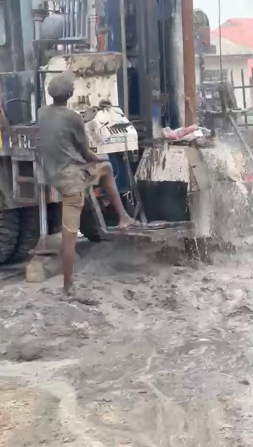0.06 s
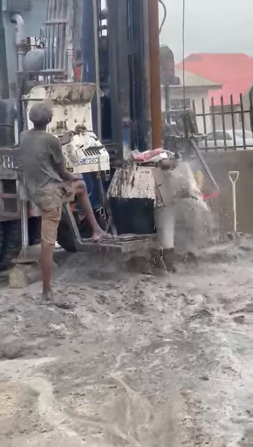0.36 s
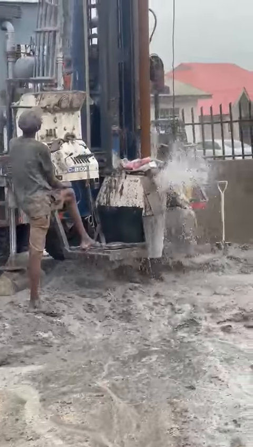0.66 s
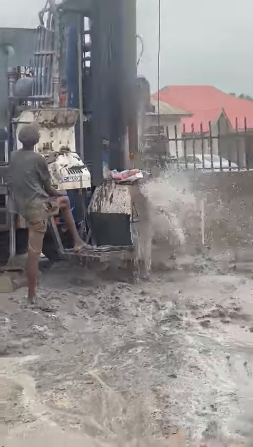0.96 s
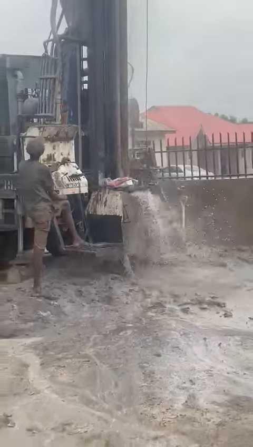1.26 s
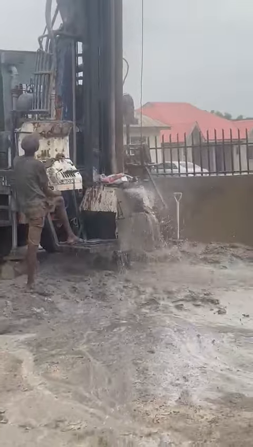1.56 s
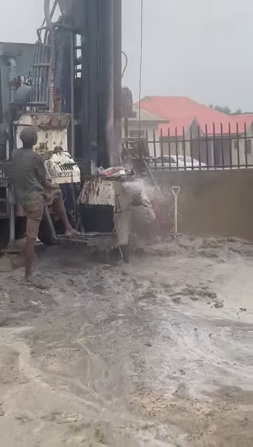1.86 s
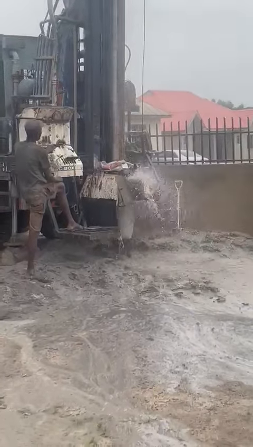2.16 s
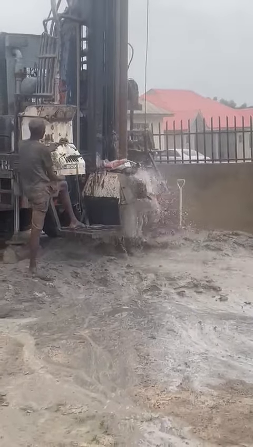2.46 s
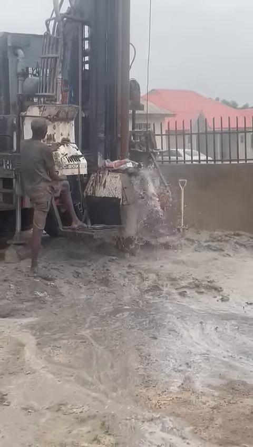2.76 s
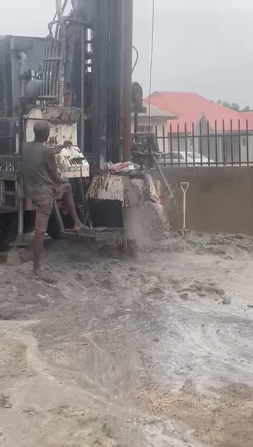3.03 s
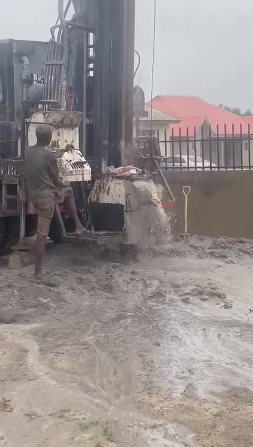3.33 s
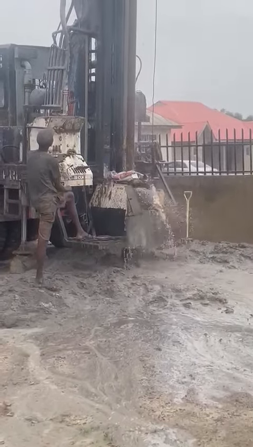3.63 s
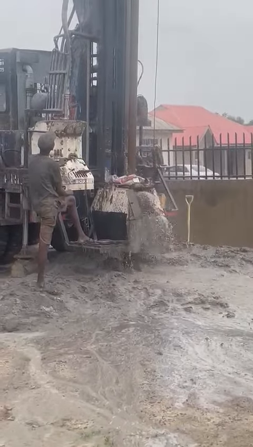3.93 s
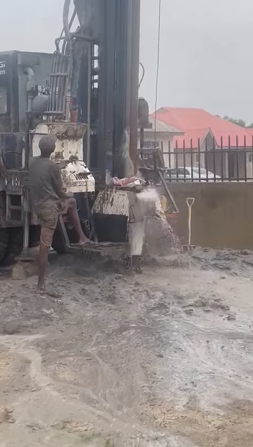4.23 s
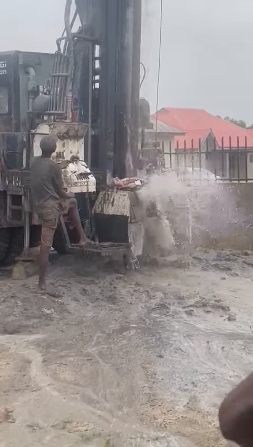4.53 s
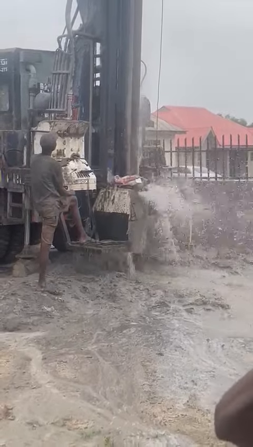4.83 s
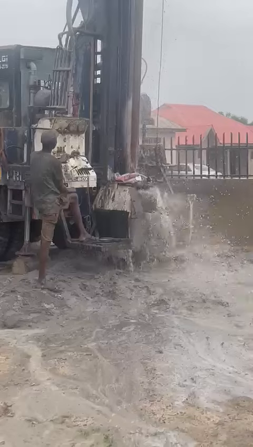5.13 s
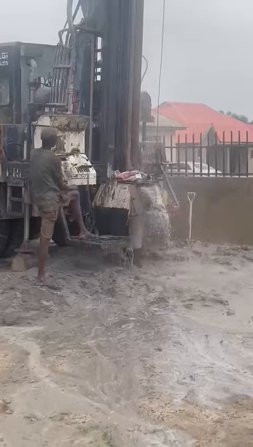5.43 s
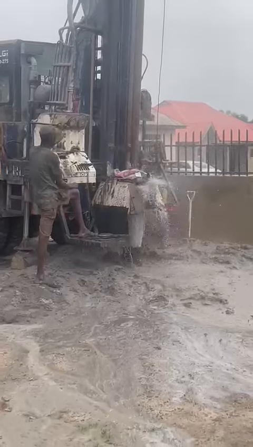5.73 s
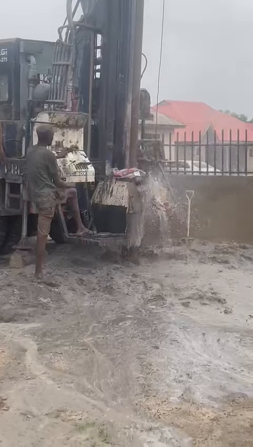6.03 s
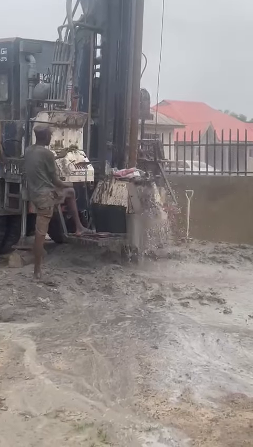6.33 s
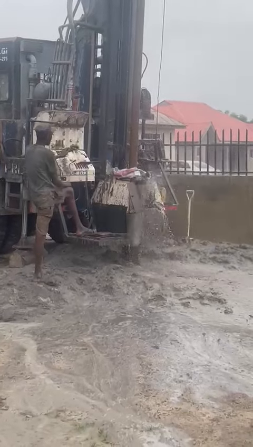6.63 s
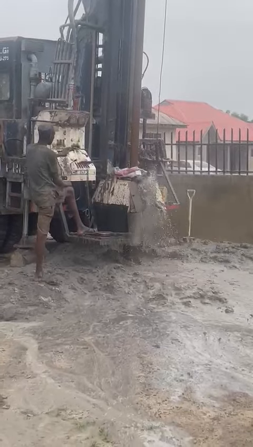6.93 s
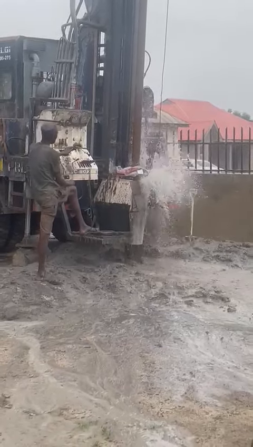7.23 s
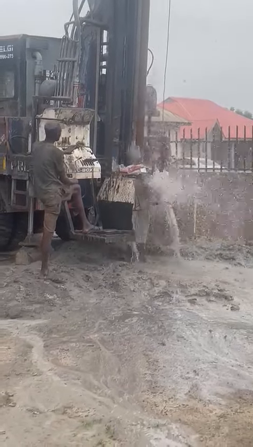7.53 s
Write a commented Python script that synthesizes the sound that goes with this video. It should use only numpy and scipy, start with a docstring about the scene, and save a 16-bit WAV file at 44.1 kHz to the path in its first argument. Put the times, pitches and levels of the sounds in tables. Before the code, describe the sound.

A borehole drilling rig runs outdoors, its diesel engine and air compressor making a steady, deep drone and roar. Over it the turning steel pipe rings and squeals unevenly, with a fast hammering chatter. Air blows muddy water from the hole in repeated gushing, hissing surges, with a few sharp spits. A hand bumps the microphone softly a few times.

```python
"""A truck-mounted drilling rig, heard from the open yard where it sinks a borehole. Its six-cylinder
diesel drones in the middle, beating against the hum of an air compressor. The hammer and the turning
pipe keep the steel ringing and squealing, while compressed air throws muddy water out of the hole in
surges. Right at the microphone a hand bumps softly, and for three seconds a fingertip shades one of
the two ports, turning the roar wide and hollow."""
import sys
import numpy as np
from scipy import signal
from scipy.fft import rfft, irfft, next_fast_len
from scipy.io import wavfile
from scipy.ndimage import uniform_filter1d

SR = 44100
rng = np.random.default_rng(int(sys.argv[2]) if len(sys.argv) > 2 else 0)


def bounce(signal):
    """Save signal as a 16-bit WAV file at the path given by the first command-line argument."""
    frames = np.transpose(np.atleast_2d(signal))
    limited = np.clip(frames, -1, 1)
    pcm = np.round(limited * 32767).astype(np.int16)
    wavfile.write(sys.argv[1], SR, pcm)


N = 339129
T = np.arange(N) / SR


def amp(db):
    """Decibels to gain."""
    return 10 ** (np.asarray(db) / 20)


def unit(x):
    """Scales to an rms of one."""
    return x / np.sqrt(np.mean(x ** 2) + 1e-20)


def over_time(rows):
    """One curve for each column of a table of times."""
    times, *columns = np.transpose(rows)
    return [np.interp(T, times, column) for column in columns]


def over_hz(rows, hz):
    """One curve for each column of a table of frequencies."""
    row_hz, *columns = np.transpose(rows)
    return [np.interp(np.log(hz + 1), np.log(row_hz + 1), column) for column in columns]


def colour(x, spectrum, tilt_db=0):
    """Gives x a spectrum, tilted by so many dB an octave, at unit level."""
    size = next_fast_len(x.shape[-1])
    hz = np.fft.rfftfreq(size, 1 / SR)
    gain = amp(over_hz(spectrum, hz)[0] + tilt_db * np.log2(np.clip(hz, 400, 7500)))
    return unit(irfft(rfft(x, size) * gain, size)[..., :x.shape[-1]])


def drift(rate):
    """A random curve of unit size that heads for a new value `rate` times a second."""
    knots = rng.standard_normal(4096)
    return unit(np.interp(T * rate, np.arange(len(knots)), knots))


def noise():
    """Two unrelated white noises."""
    return rng.standard_normal((2, N))


def patchy(x, depth_db, size):
    """Turbulence: patches of size (bins, frames) swell and fade."""
    spectrum = signal.stft(x, nperseg=256)[2]
    patches = uniform_filter1d(rng.standard_normal(spectrum.shape[1:]), size[0], axis=0)
    patches = unit(uniform_filter1d(patches, size[1], axis=1))
    return signal.istft(spectrum * amp(depth_db * patches))[1][:, :N]


def cycle_tones(turns, harmonics, waver, lag_turns=.14):
    """Harmonics of a six-pulse cycle: every sixth stays in step, and the weaker ones waver more."""
    top_db = max(db for _, db in harmonics)
    out = 0
    for k, db in harmonics:
        # each overtone of the pulse lags a little, so the pressure climbs slowly and drops fast
        phase = rng.random() if k % 6 else -lag_turns * (k // 6 - 1)
        level = amp(db + waver * (top_db - db) * drift(rate=7))
        out = out + np.sqrt(2) * level * np.cos(2 * np.pi * (k * turns + phase))
    return out


# The diesel on the truck; uneven cylinders leave lines between the firing tones.
# Each row: multiple of the six-firing cycle, level in dB.
DIESEL_TONES = [(5, -46), (6, -12), (7, -45.5), (8, -44), (9, -40), (10, -46), (11, -38.5), (12, -23.5),
                (13, -44), (14, -41.5), (15, -38.5), (17, -50), (18, -41.5), (20, -48.5), (22, -48),
                (23, -51.5), (24, -44), (26, -48.5), (30, -49), (32, -55.5), (33, -53)]
# The compressor's hum. Each row: multiple of its cycle, level in dB.
COMPRESSOR_TONES = [(5, -38), (6, -32.5), (12, -54), (18, -50)]
def engines(firings, compressor_cycle_hz=22.3):
    """The diesel's exhaust drones deeply; the compressor beats against its second firing harmonic."""
    diesel = cycle_tones(firings / 6, DIESEL_TONES, waver=0.051)
    compressor = cycle_tones(compressor_cycle_hz * T + .033, COMPRESSOR_TONES, waver=0.031)
    return diesel + compressor


# Exhaust, fans and gears, heard together across the yard. Each row: frequency in Hz, relative dB.
ROAR_SPECTRUM = [(15, -18), (40, -5.5), (65, 1), (150, 0), (220, -6), (300, -6.5), (430, -6.5), (560, -5.5),
                 (700, -7), (860, -9), (1150, -2.5), (1500, -21.5), (3000, -14.5), (8000, -59)]
def roar(firings, level_db=-28.0, throb=0.059):
    """Exhaust and fan turbulence swells with every firing."""
    puffs = noise() * (1 + throb * np.cos(2 * np.pi * firings))
    return amp(level_db) * colour(patchy(puffs, depth_db=2.5, size=(3, 14)), ROAR_SPECTRUM)


def hammer(blows_hz=25.84, decay_turns=0.4, depth=0.7):
    """The air hammer's force jumps at each uneven blow, then falls."""
    turns = np.cumsum(blows_hz * (1 + .02 * drift(rate=5))) / SR
    strength = depth * amp(5.2 * drift(rate=21))
    return unit(1 + strength * np.exp(-(turns % 1) / decay_turns))


# The steady gush at the mouth of the hole. Each row: time in seconds, relative level in dB.
STEADY_GUSH = [(0, -37), (0.2, -32.5), (0.5, -32.5), (1.2, -29), (1.42, -33.5), (1.7, -29.5), (3.95, -30),
               (4.3, -25.5), (5.05, -27), (5.19, -29.5), (5.3, -32), (7.69, -29)]
# Surges of air and water out of the hole.
# Each row: peak time and length in seconds, then gush, spray and jet in relative dB.
WATER_SURGES = [(0.548, 0.43, -29.5, -54, -29), (1.067, 0.17, -29, -33, -42), (1.25, 0.16, -28.5, -48, -45),
                (1.757, 0.22, -23.5, -32, -45), (2.004, 0.19, -29, -36, -48), (2.363, 0.17, -31, -31, -44),
                (2.527, .14, -31, -53, -44), (2.772, 0.27, -29.5, -56, -47),
                (3.17, 0.48, -25.5, -35.5, -47), (3.477, 0.27, -28.5, -38, -46),
                (4.093, 0.18, -25, -42, -44), (4.33, 0.32, -29, -39, -44), (4.48, 0.23, -24, -34.5, -35.5),
                (4.617, 0.18, -39, -52, -46), (4.803, 0.33, -25.5, -34.5, -45),
                (4.99, 0.16, -23.5, -39, -32), (5.09, 0.16, -28, -35, -44), (5.36, 0.48, -30, -35.5, -44),
                (5.574, 0.37, -26, -39, -36), (5.985, 0.15, -28, -33.5, -32), (6.125, 0.2, -26.5, -44, -43),
                (6.366, 0.26, -25, -35, -24.5), (6.574, 0.4, -25, -57, -46), (6.878, 0.19, -27.5, -50, -33),
                (7.053, 0.27, -30.5, -36.5, -45), (7.447, 0.28, -34, -33, -34),
                (7.633, 0.22, -23, -41, -31)]
def flow_levels(steady_spray_db=-37.5, steady_jet_db=-41):
    """Gush, spray and jet in relative dB: each surge swells and sinks on top of the steady flow."""
    steady_gush_db, = over_time(STEADY_GUSH)
    power = amp(np.broadcast_arrays(steady_gush_db, steady_spray_db, steady_jet_db)) ** 2
    for peak, length, *levels_db in WATER_SURGES:
        during = abs(T - peak) < length / 2
        swell = np.cos(np.pi * (T[during] - peak) / length)
        power[:, during] += np.outer(amp(levels_db), swell) ** 2
    return 10 * np.log10(power)


def drops(per_s, spread_db):
    """Drops of uneven size click at random moments."""
    sizes = amp(spread_db * np.minimum(rng.exponential(1, (2, N)), 4))
    return unit(sizes * np.sign(noise()) * (rng.random((2, N)) < per_s / SR))


# At the hole: muddy gush, air jet at the collar, spray and mist. Each row: frequency in Hz, relative dB.
GUSH_SPECTRUM = [(300, -20), (900, 0), (1150, -4), (1400, 2), (2000, 0.5), (2500, -3), (2800, -11.5),
                 (3100, -15.5), (3600, -10.5), (4200, -19.5), (6000, -15.5), (11000, -73)]
JET_SPECTRUM = [(1400, -14), (2200, 6.5), (2550, 2), (2800, -4), (3100, -4), (3650, -7), (4400, -23),
                (8000, -49)]
SPRAY_SPECTRUM = [(1000, -31), (2500, -11), (3600, 8.5), (4400, 3), (4900, 5), (6000, 4.5), (6800, 1.5),
                  (7400, -2.5), (8200, 14), (9200, -78), (11500, -3)]
MIST_SPECTRUM = [(3000, -5), (7000, 1), (8300, -15), (9300, -51), (10000, 14.5), (10700, 9), (11300, 4.5),
                 (11800, -14)]
# Fine mist hanging over the hole. Each row: time in seconds, relative level in dB.
MIST_SWELL = [(0, -38), (1.15, -33.5), (2.6, -36), (4.6, -36.5), (4.8, -33.5), (5.15, -32.5), (5.7, -36.5),
              (6.0, -35.5), (6.7, -39), (7.4, -34.5), (7.69, -35)]
def water(force):
    """Air gushes out in time with the hammer, hisses past the collar and tears water to spray and mist."""
    gush_db, spray_db, jet_db = flow_levels()
    mist_db, = over_time(MIST_SWELL)
    splutter_db = 1.27 * drift(rate=55) + 1.34 * drift(rate=16)  # quick splutter, slower slosh
    gush = patchy(noise() * force + .5 * drops(per_s=700, spread_db=1.0), depth_db=2.1, size=(4, 8))
    jet = patchy(noise() * force, depth_db=1.5, size=(3, 8))
    spray = patchy(noise() + 0.5 * drops(per_s=1400, spread_db=-0.5), depth_db=3.5, size=(5, 12))
    mist = patchy(noise() + 0.6 * drops(per_s=2500, spread_db=1.0), depth_db=2.5, size=(6, 10))
    return (colour(gush, GUSH_SPECTRUM) * amp(gush_db - 5 + .5 * splutter_db)
            + colour(jet, JET_SPECTRUM) * amp(jet_db - 5)
            + colour(spray, SPRAY_SPECTRUM) * amp(spray_db - 2 + splutter_db)
            + colour(mist, MIST_SPECTRUM) * amp(mist_db - 2 + .5 * splutter_db))


def ring(drive, hz, width):
    """One mode of the steel, with steep skirts, at unit level."""
    b, a = signal.iirpeak(hz, hz / (1.5 * width), fs=SR)
    return unit(signal.lfilter(b, a, signal.lfilter(b, a, drive)))


def held(x, firmness=0.63):
    """Steady contact evens out the slow swells of a ringing mode."""
    power = abs(uniform_filter1d((x ** 2).mean(0), size=5000)) + 1e-9
    return unit(x / power ** (firmness / 2))


def shaking(force):
    """The smoothed, bounded motion that the hammer gives to the steel."""
    motion = unit(uniform_filter1d(force - force.mean(), size=400))
    return unit(np.tanh(motion))


# Modes of the guide around the pipe. Each row: frequency and width in Hz, level in dB.
GUIDE_MODES = [(653, 30, -42), (734.5, 30, -39.5)]
def guide():
    """The guide hums with the rubbing pipe and rings when it is knocked."""
    drive = noise()
    drive[0] += knocks()  # into the part that left and right share
    return sum(amp(db) * ring(drive, hz, width) for hz, width, db in GUIDE_MODES)


# Modes of the drill pipe. Each row: frequency and width in Hz, relative level in dB.
PIPE_MODES = [(1014, 34, -9.5), (1087, 28, -3.5), (1102, 13, -6.5), (1122.3, 6.6, 1.5), (1144, 5.3, -7),
              (1174, 15, -9), (1227, 9, -9), (1221, 19, -6)]
# How hard the pipe grinds. Each row: time in seconds, relative load in dB.
PIPE_LOAD = [(0.0, -39), (0.3, -37.5), (0.5, -35), (0.85, -31), (0.95, -38), (1.24, -36), (1.45, -37),
             (1.63, -47), (1.76, -28), (2.0, -30.5), (2.12, -38), (2.24, -29.5), (2.36, -45), (2.5, -30),
             (2.7, -39.5), (2.85, -30), (3.19, -30.5), (3.6, -31), (3.77, -35), (3.9, -27), (4.0, -31.5),
             (4.07, -27.5), (4.55, -25.5), (4.68, -28), (4.8, -28), (5.08, -26.5), (5.16, -36), (5.45, -35),
             (5.63, -24.5), (5.87, -39), (6.0, -29), (6.25, -39.5), (6.43, -28.5), (6.7, -32.5), (7.0, -34),
             (7.2, -39), (7.35, -32), (7.69, -32.5)]
# The ring bends as the contact shifts.
# Each row: time in seconds, pitch in Hz, whose ratio to the average bends all the modes.
PIPE_BEND = [(0, 1124), (2.7, 1123), (3.1, 1108), (3.7, 1124), (4.3, 1120), (4.6, 1106), (4.85, 1134),
             (5.0, 1116), (5.6, 1126), (6.05, 1128), (6.5, 1112), (7.1, 1124)]
def pipe(force, level_db=-32, follow=0.94, chatter=0.16, wander=0.00249, restless_db=1.8):
    """Grinding rings the pipe; its modes take turns and bend, and the hammer chops them into a chatter."""
    load_db, = over_time(PIPE_LOAD)
    pitch, = over_time(PIPE_BEND)
    modes = held(sum(amp(db + restless_db * drift(rate=7)) * ring(noise(), hz, width)
                     for hz, width, db in PIPE_MODES))
    bent_time = T + np.cumsum(pitch / pitch.mean() - 1 + wander * drift(rate=12)) / SR
    bent = np.array([np.interp(bent_time, T, channel, period=N / SR) for channel in modes])
    level = amp(level_db + follow * (load_db - load_db.mean()))
    return level * bent * unit(1 + chatter * shaking(force))


# Modes of the mast above the hole. Each row: frequency and width in Hz, level in dB at average gush.
MAST_MODES = [(1328, 14, -44), (1448, 13, -41.5), (1537, 20, -43.5), (1649, 31, -42), (1848, 6.6, -44.5),
              (1926, 22, -42.5), (1949, 11, -42), (2393, 18, -45), (2540, 29, -46.5), (2588, 36, -48.5),
              (2944, 11, -46.5), (2976, 8.5, -46), (3053, 35, -47), (3140, 15.5, -46), (3244, 22, -48),
              (3487, 33, -47.5), (4290, 25, -54.5), (6220, 90, -54), (6970, 96, -59.5)]
def mast(force, follow=0.52, restless_db=1.5):
    """The hammer rings the mast, and more so while mud blasts against it."""
    gush_db = flow_levels()[0]
    drive = noise() * force
    modes = sum(amp(db + restless_db * drift(rate=9)) * held(ring(drive, hz, width))
                for hz, width, db in MAST_MODES)
    return amp(follow * (gush_db - gush_db.mean())) * modes


# Squeals of the rubbing pipe.
# Each row: start and length in seconds, pitch in Hz, level in dB at the height, chatter from 0 to 1.
PIPE_SQUEALS = [(-.08, .35, 1125, -30.5, .5), (-.1, .8, 1191, -38, .4), (-.1, .8, 3480, -43, 1),
                (.12, .2, 2945, -38, .6), (.35, 1.35, 1848, -40, .4), (.44, .22, 2960, -37.5, .7),
                (.5, .22, 2600, -39, .8), (.98, .62, 1192, -27.5, .55), (1.07, .42, 1143, -31.5, .6),
                (1.07, .42, 1117, -33, .6), (1.43, .44, 1848, -27.5, .35), (1.8, .3, 1846, -33.5, .45),
                (1.92, .1, 1970, -34, .4), (1.95, 1.7, 2974, -36.5, .25), (2.03, .27, 1325, -38, .3),
                (2.5, .35, 3105, -40, .8), (2.8, .36, 2962, -37, .9), (2.83, .27, 2940, -35.5, 1),
                (3.0, .62, 1455, -38, .6), (3.33, .15, 2966, -38, .3), (3.98, .5, 1120, -31, .8),
                (4.27, .17, 1655, -35, .8), (4.38, .25, 2972, -39, .6), (4.41, .24, 1448, -33, .8),
                (4.45, .22, 1103, -28.5, .8), (4.5, .22, 1965, -36, .8), (4.66, .38, 1062, -33, 1),
                (4.9, .2, 2972, -39, .6), (4.94, .1, 1848, -35, .7), (5.22, .25, 1848, -38, .3),
                (5.72, 1.35, 2980, -36.5, .3), (6.0, .85, 3118, -38.5, .6), (6.2, .28, 2505, -36, .8),
                (6.3, .14, 2595, -36, .6), (6.34, .42, 1108, -32.5, .9), (6.56, .18, 2595, -36, .6),
                (6.78, .42, 2980, -40, .5), (7.3, .16, 2975, -39.5, .5), (7.5, .3, 2950, -38, .6)]
def squeals(force, wobble_hz=6, flutter_db=1.2, shake_depth=.7):
    """Stick and slip make one mode sing, swell and fade; the hammer shakes it into a chatter."""
    out, shake = 0, shaking(force)
    for start, length, hz, db, chatter in PIPE_SQUEALS:
        grip = unit(amp(flutter_db * drift(rate=42)) * (1 + shake_depth * chatter * shake))
        swell = np.sin(np.pi * np.clip((T - start) / length, 0, 1)) * grip
        phase = 2 * np.pi * np.cumsum(hz + wobble_hz * (1 + chatter) * drift(rate=80)) / SR
        out = out + np.sqrt(2) * amp(db) * swell * np.array([np.cos(phase), np.sin(phase)])
    return out


# Slugs of water spat from the hole by the air, and near 1.7 s a few sharp cracks of stone chips striking the
# deflector. # Each row: start in seconds, level in dB, rise and decay in seconds, brightness in dB per octave.
SLUGS_AND_CHIPS = [(0.161, -27.5, .006, 0.021, 1), (.815, -21.5, 0.02, 0.012, -2),
                   (0.9, -27, 0.0092, 0.015, -2), (1.694, -17, .002, 0.0033, 15),
                   (1.696, -18, .004, 0.029, 11.5), (1.701, -13, 0.00072, .004, 13),
                   (1.736, -19.5, 0.0037, 0.013, -8), (1.767, -26, .003, 0.02, -7),
                   (1.8, -26, 0.0089, 0.025, -7), (2.616, -26.5, 0.0059, 0.015, 4),
                   (2.87, -27, 0.0088, .02, -8), (3.03, -25.5, 0.011, 0.026, 10),
                   (3.551, -18, 0.0011, .003, -5), (3.561, -24, 0.0073, 0.018, -7),
                   (3.925, -27.5, 0.022, 0.053, 10.5), (4.129, -32, 0.015, 0.017, 13),
                   (4.74, -26, 0.021, 0.025, 11), (5.955, -28, 0.016, 0.036, 9),
                   (6.428, -25.5, 0.0078, 0.029, 5.5), (6.78, -27, .013, 0.021, 12),
                   (7.141, -29, 0.028, .025, 11), (7.4, -25.5, 0.0096, 0.018, 8)]
# The hiss of a slug. Each row: frequency in Hz, relative dB.
SLUG_SPECTRUM = [(300, -28), (1100, 12.5), (3000, 11.5), (4500, -4.5), (7000, -5), (9000, -37), (12000, -9)]
def spits():
    """Each slug of water bursts out with a quickly dying hiss and mostly swells softly; stone chips crack
    sharply against the deflector."""
    out, t = np.zeros((2, N)), T[:SR // 2]
    for start, db, rise, decay, bright_db in SLUGS_AND_CHIPS:
        hiss = colour(rng.standard_normal((2, len(t))), SLUG_SPECTRUM, bright_db)
        burst = hiss * np.minimum(t / rise, 1) * np.exp(-np.maximum(t - rise, 0) / decay)
        part = out[:, round(start * SR):][:, :len(t)]
        part += amp(db) * burst[:, :part.shape[1]]
    return out


# Dull knocks of the pipe on its guide. Each row: time in seconds, impulse in dB over the rubbing.
GUIDE_KNOCKS = [(.422, 53), (1.344, 47), (2.186, 48), (5.195, 53.5), (6.137, 51), (6.269, 52), (7.379, 48)]
def knocks(contact_s=0.0022):
    """The pipe gives soft, short pushes that reach only the low modes."""
    pushes = sum(amp(db) * np.exp(-np.minimum(abs(4 * (T - time) / contact_s), 10) ** 2)
                 for time, db in GUIDE_KNOCKS)
    pulse_area = np.sqrt(np.pi) * contact_s * SR / 4
    return pushes / pulse_area


# A hand on the microphone's housing. Each row: start in seconds, level in dB, length in seconds.
HAND_BUMPS = [(0.633, -30, 0.13), (2.57, -33, 0.097), (2.683, -36, 0.084), (5.653, -41, 0.061),
              (7.158, -39, 0.051)]
# Its dull thud. Each row: frequency in Hz, relative dB.
BUMP_SPECTRUM = [(30, -17), (90, -4), (200, 15), (450, -22), (1200, -10), (5000, -70)]
def bumps():
    """The hand thuds softly at each port on its own."""
    swell = sum(amp(db) * np.sin(np.pi * np.clip((T - start) / length, 0, 1))
                for start, db, length in HAND_BUMPS)
    return swell * colour(noise(), BUMP_SPECTRUM)


# The rig at the two microphone ports. Each row: frequency in Hz, lead of the left port in radians.
PORT_LEAD = [(0, 0.8), (200, -.1), (600, -.45), (900, -1), (1200, -.9), (1600, 0.12), (4100, 0),
             (4900, 3.02), (5400, 5.82), (6800, 6.5), (8200, 9.1), (9600, 8.71), (11500, 12.27)]
# How alike left and right sound: wide near 1 kHz, narrow in the treble.
# Each row: frequency in Hz, likeness from 0 to 1.
STEREO_LIKENESS = [(100, 1), (300, 1), (720, 0.91), (1000, 0.35), (1150, 0.91), (1400, 0.92), (1650, 1),
                   (2300, 1), (3100, 0.82), (3800, 1), (4500, 1), (5800, 1), (7400, 1), (9000, 0.98)]
# A fingertip over one port. Each row: time in seconds, cover from 0 to 1.
FINGER_COVER = [(2.5, 0), (2.6, .72), (3.4, .9), (4.6, 1), (5.68, .88), (5.74, 0)]
# Its effect at full cover. Each row: frequency in Hz, added lead in radians, factor on likeness.
FINGER_SHADE = [(100, -.4, .95), (250, -.3, .92), (480, -.75, .6), (690, -.8, .95), (800, -1.8, 1.2),
                (870, -2.25, 1.55), (930, -1.9, 1.5), (1010, -.9, 1.1), (1130, -.9, .9), (1280, -1, .35),
                (1600, 0, 1)]
def stereo_image(pair):
    """Left and right are partly the same sound at different phases; the fingertip shifts the low mids."""
    hz, t, (shared, differing) = signal.stft(pair, SR, nperseg=1024)
    cover = np.interp(t, *np.transpose(FINGER_COVER))
    shade_lead, shade_likeness = over_hz(FINGER_SHADE, hz)
    lead = over_hz(PORT_LEAD, hz)[0][:, None] + np.outer(shade_lead, cover)
    open_likeness = over_hz(STEREO_LIKENESS, hz)[0][:, None]
    likeness = np.clip(open_likeness * (1 + np.outer(shade_likeness - 1, cover)), 0, 1)
    common = shared * np.sqrt((1 + likeness) / 2)
    apart = differing * np.sqrt((1 - likeness) / 2)
    turn = np.exp(.5j * lead)
    left, right = (common + apart) * turn, (common - apart) / turn
    return signal.istft(np.array([left, right]))[1][:, :N]


# The diesel's pace, which drives both drone and roar. Each row: time in seconds, firings a second.
FIRING_RATE = [(0, 64.97), (1.3, 64.86), (2.5, 64.94), (5, 64.94), (7.7, 65.24)]
def scene():
    """From the yard the drone sits in the middle, with the roar, steel and water around it."""
    firings = np.cumsum(over_time(FIRING_RATE)[0]) / SR
    force = hammer()
    steel = guide() + pipe(force) + mast(force) + squeals(force)
    drone = engines(firings)
    around = roar(firings) + steel + water(force) + spits()
    return drone + stereo_image(around) + bumps()


def record(dry, edge_hz=11600):
    """The recorder's band ends steeply in the high treble."""
    lowpass = signal.firwin(511, edge_hz, window=("kaiser", 9), fs=SR)
    return signal.oaconvolve(dry, lowpass[None], "same")


dry = scene()
out = record(dry)
bounce(out)
```